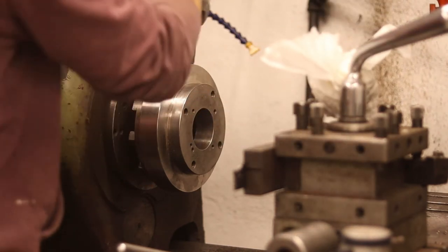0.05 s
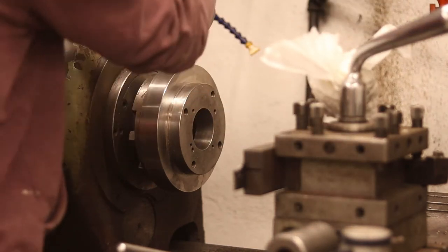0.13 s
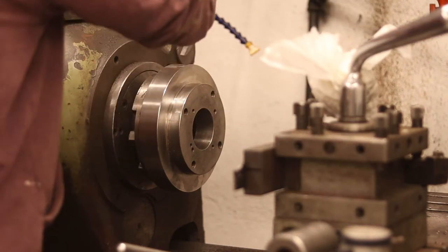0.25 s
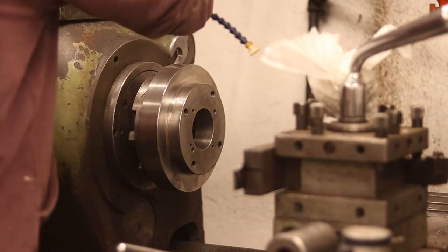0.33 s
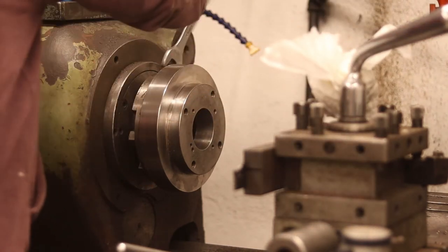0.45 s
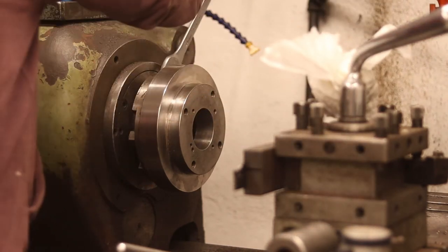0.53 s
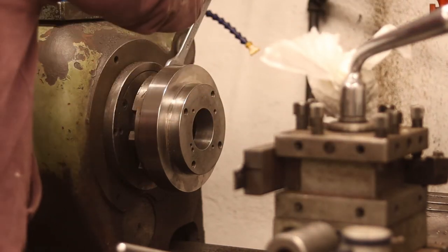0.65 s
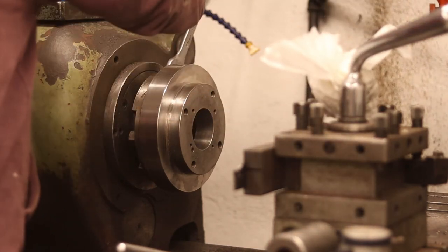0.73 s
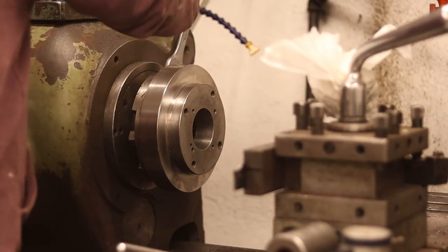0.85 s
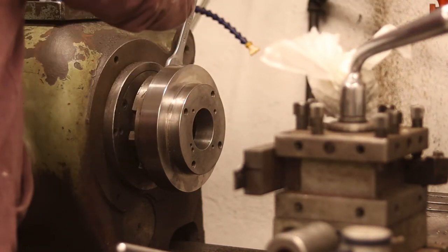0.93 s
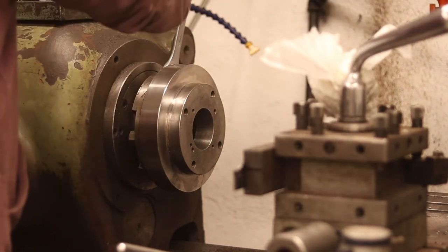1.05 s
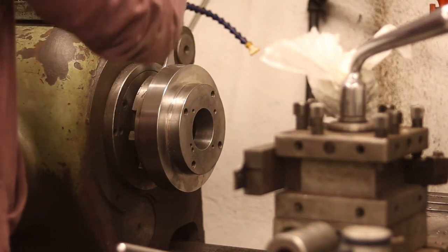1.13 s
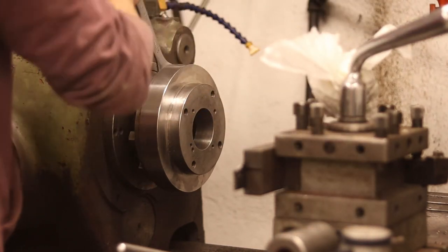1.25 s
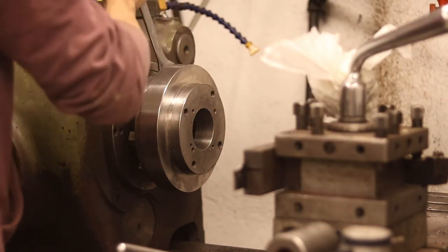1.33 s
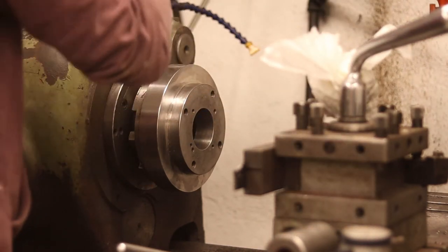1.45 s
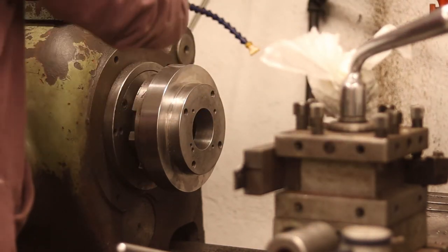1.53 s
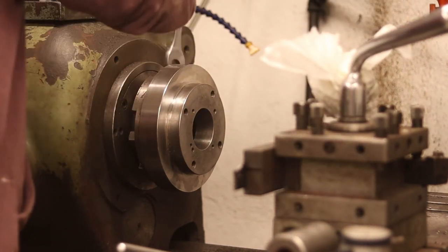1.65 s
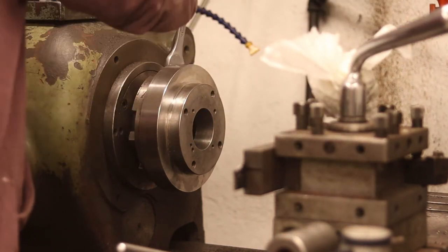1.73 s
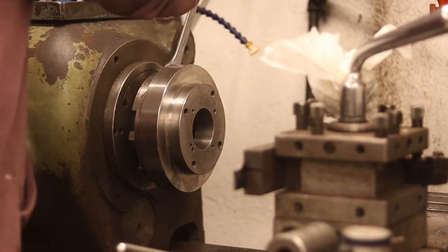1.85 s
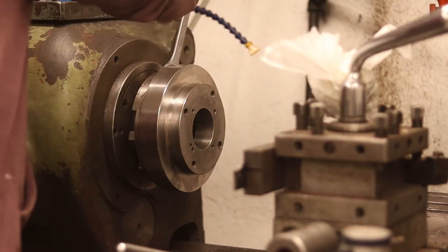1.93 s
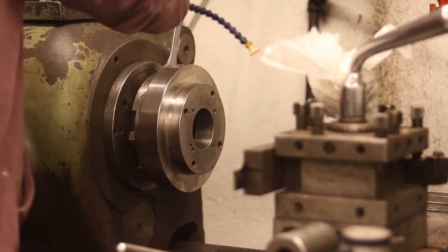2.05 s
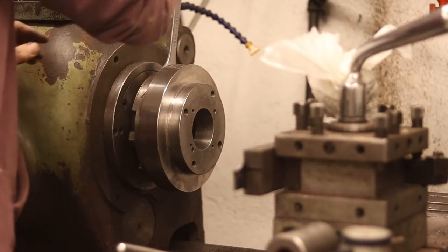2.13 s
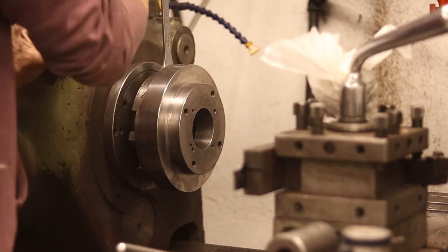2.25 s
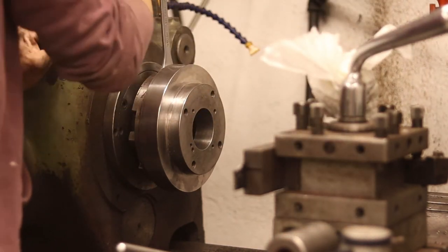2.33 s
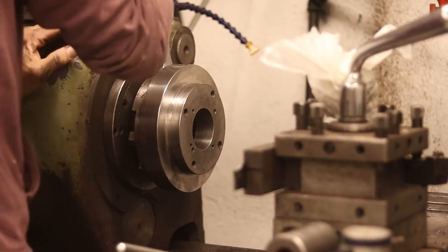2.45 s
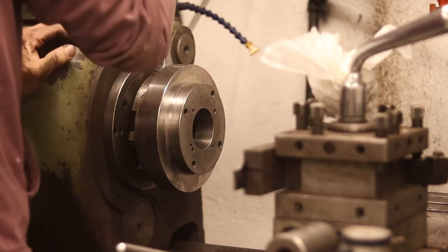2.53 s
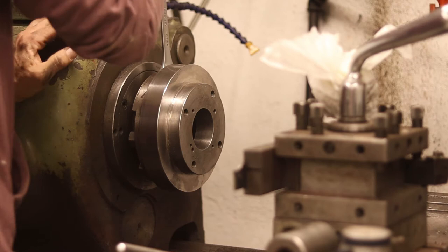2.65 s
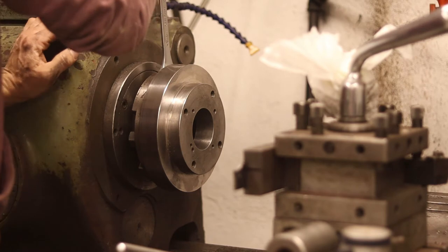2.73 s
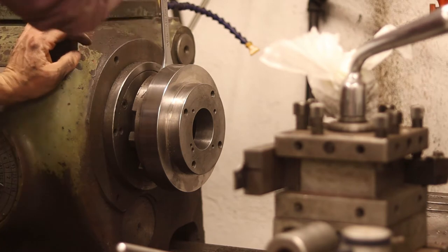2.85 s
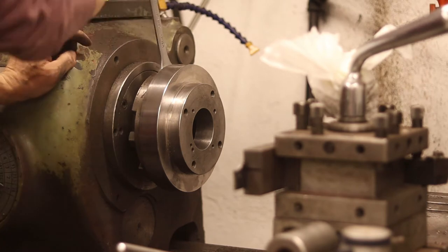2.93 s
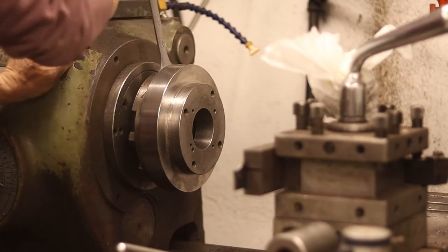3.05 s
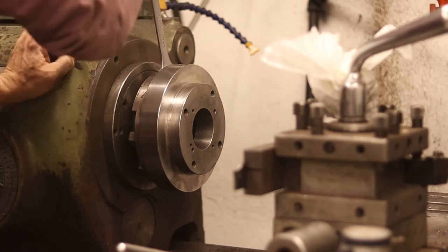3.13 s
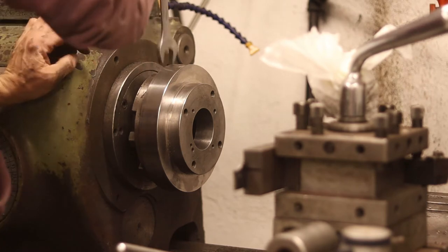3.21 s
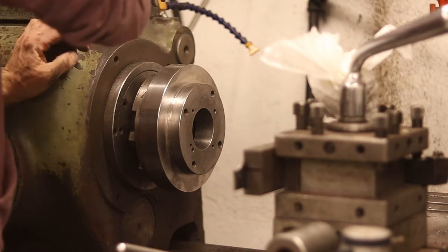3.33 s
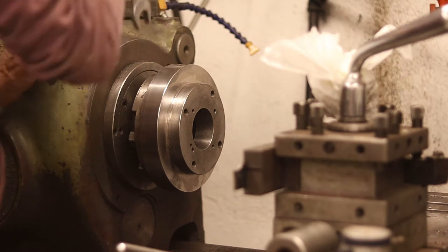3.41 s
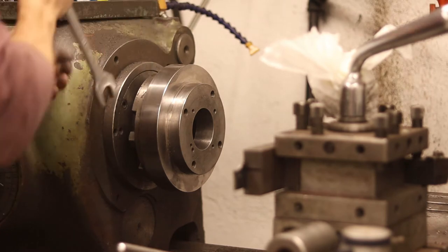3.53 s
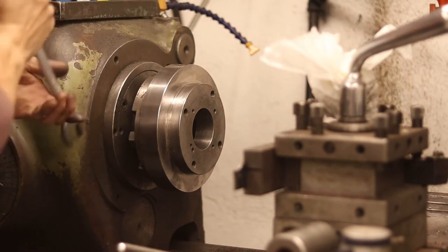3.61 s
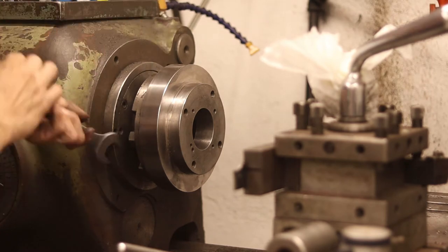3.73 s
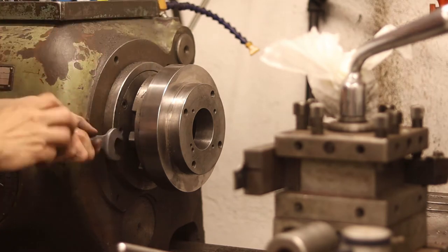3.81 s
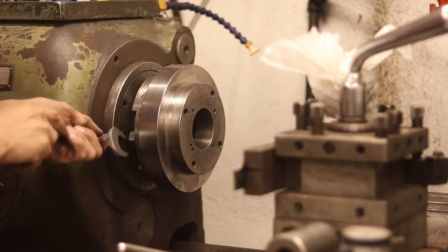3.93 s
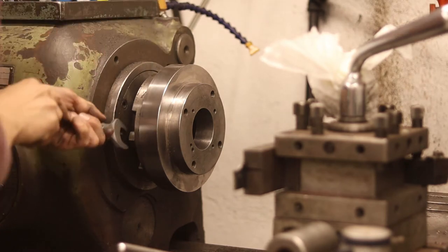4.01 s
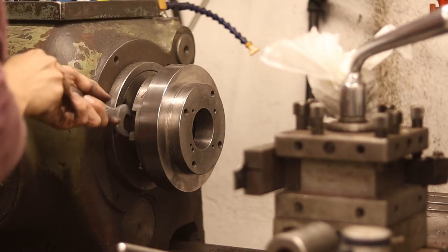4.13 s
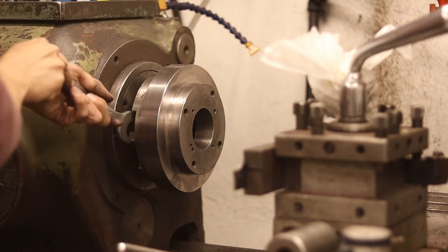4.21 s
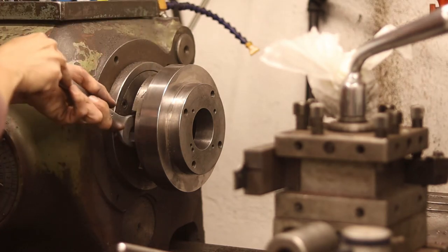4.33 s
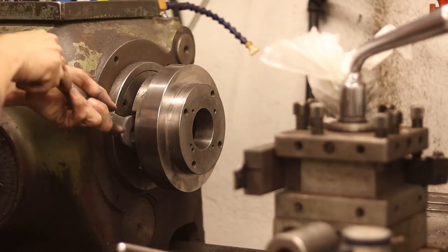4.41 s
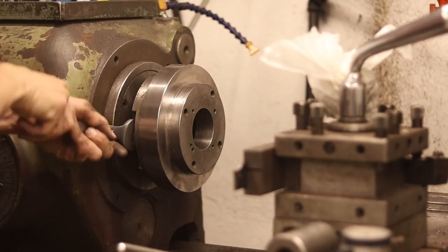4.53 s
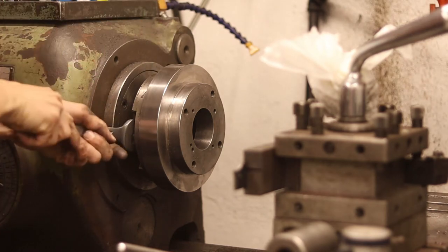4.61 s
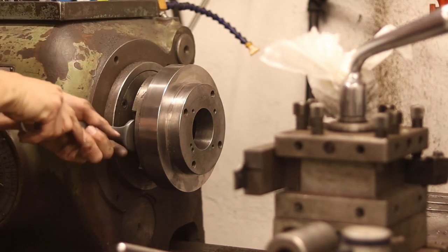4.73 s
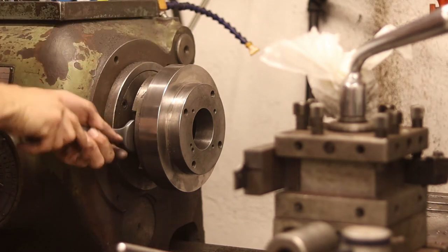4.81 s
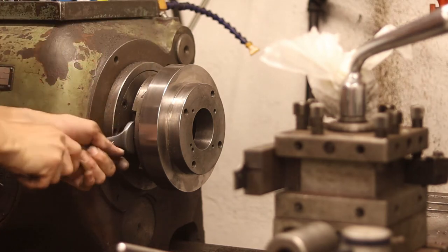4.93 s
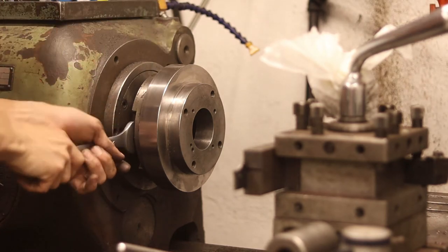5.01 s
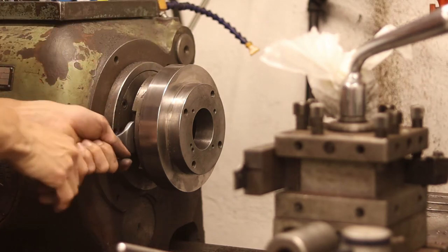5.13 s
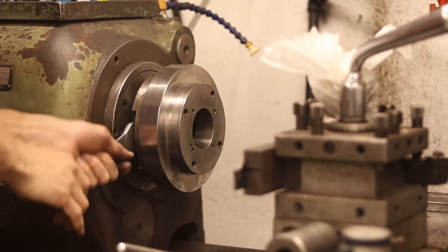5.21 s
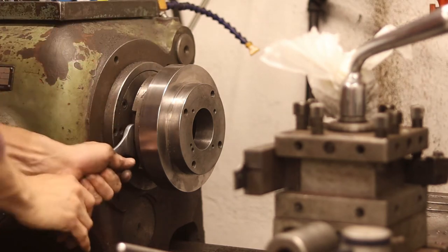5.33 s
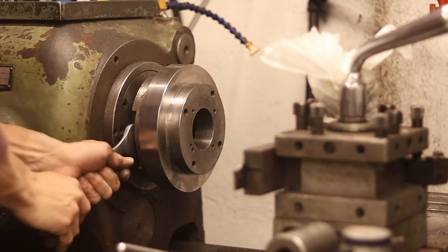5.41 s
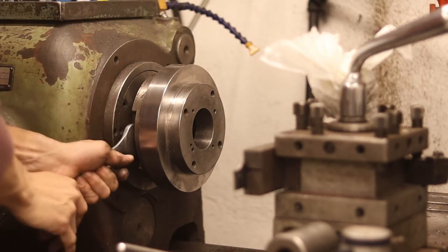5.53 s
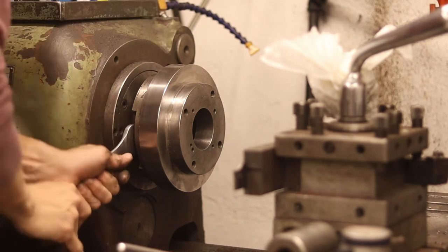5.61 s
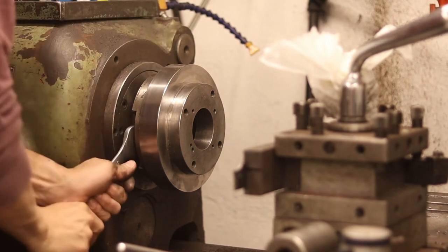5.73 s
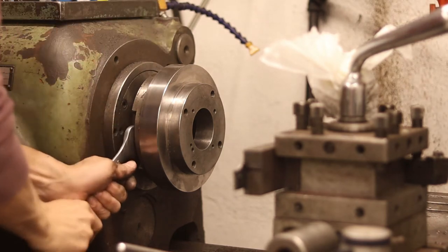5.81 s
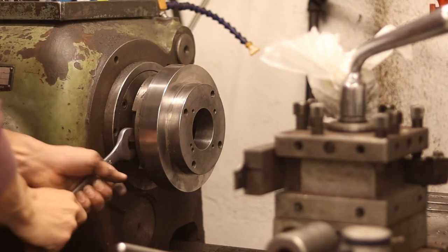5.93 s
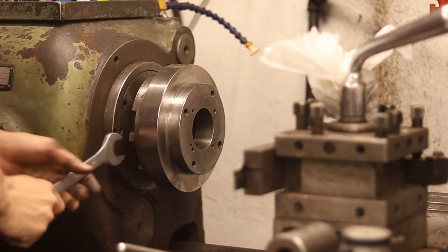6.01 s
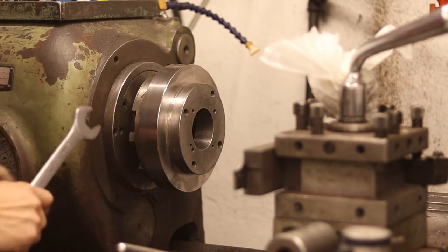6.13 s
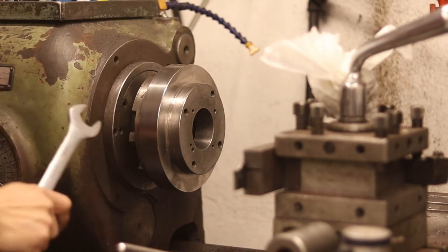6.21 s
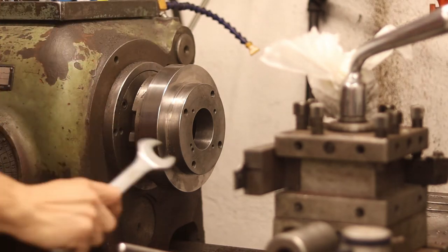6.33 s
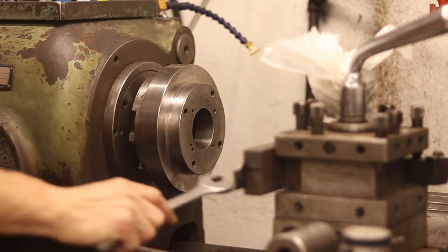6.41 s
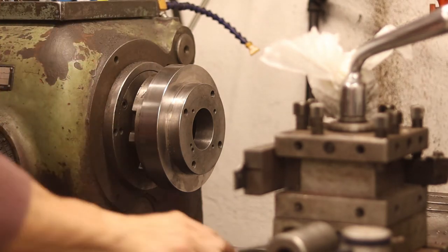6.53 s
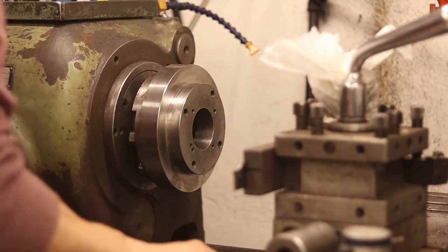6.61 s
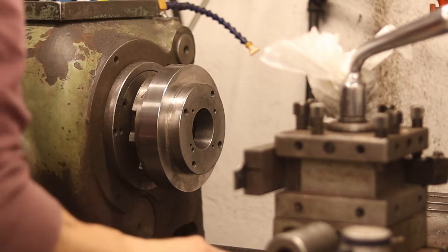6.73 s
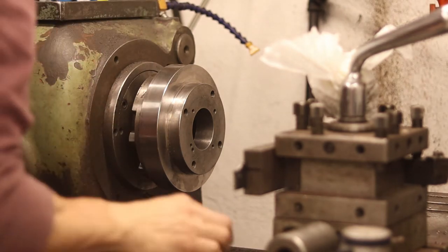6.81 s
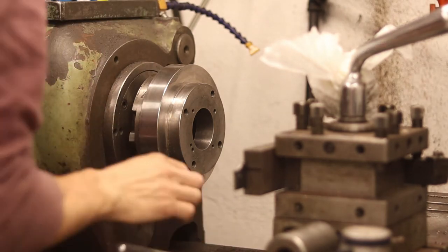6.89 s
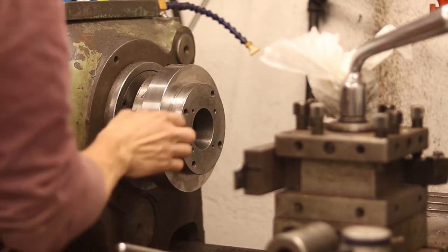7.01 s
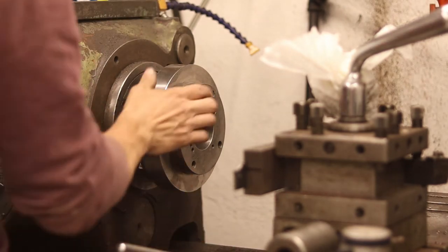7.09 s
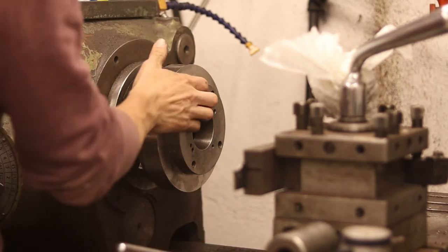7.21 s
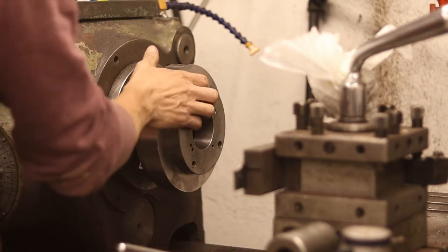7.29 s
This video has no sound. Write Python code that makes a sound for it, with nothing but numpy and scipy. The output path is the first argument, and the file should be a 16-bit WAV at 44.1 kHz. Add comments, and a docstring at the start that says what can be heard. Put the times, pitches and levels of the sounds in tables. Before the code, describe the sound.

In a small hard-walled workshop, metallic clinks and low gear clunks, brief scraping and sleeve rustle, then a dropped wrench bouncing and ringing out.

```python
"""Small hard-walled workshop, one microphone near a lathe: a steel spanner is set on the nuts of its spindle plate.
Held, it clinks as short damped modes plus a noise crack; each pull throws the spindle against its gears,
whose knocks and rebounds shake the modes of the cast headstock. Sleeve and steel rub in between as shaped noise.
At last the spanner drops on the lathe: each bounce feeds its freely ringing modes, with a noisy clatter.
Behind lie steady hiss, mains hum and faint far chirps."""
import sys
import numpy as np
from scipy import signal
from scipy.fft import rfft, irfft, next_fast_len
from scipy.io import wavfile
from scipy.ndimage import uniform_filter1d, minimum_filter1d, map_coordinates

SR = 44100
rng = np.random.default_rng(int(sys.argv[2]) if len(sys.argv) > 2 else 0)


def master(y):
    """Save y as 16-bit WAV."""
    cut = np.clip(np.atleast_2d(y).T, -1, 1)
    pcm = np.round(cut * 32767)  # scale
    wavfile.write(sys.argv[1], SR, pcm.astype(np.int16))


N = 324576  # samples


def amp(db):
    """Decibels to gain."""
    return 10 ** (np.asarray(db) / 20)


def unit(x):
    """x at rms 1."""
    return x / np.sqrt(np.mean(x ** 2) + 1e-20)


def normed(x):
    """x at energy 1."""
    return x / (np.linalg.norm(x) + 1e-20)


def along(points, hz):
    """(Hz, value) points read on a log frequency axis."""
    f, v = np.transpose(points)
    return np.interp(np.log(hz + 1), np.log(f + 1), v)


def fade(t, t60):
    """Exponential decay, 60 dB down after t60 seconds."""
    return np.exp(-np.log(1000) * t / max(t60, 1e-3))


def filtered(x, response):
    """x times a gain that depends on frequency."""
    m = next_fast_len(len(x) + 4096)
    spectrum = rfft(x, m) * response(np.fft.rfftfreq(m, 1 / SR))
    return irfft(spectrum, m)[:len(x)]


def noise(spectrum, size):
    """Noise of rms 1 with the given colour."""
    return unit(filtered(rng.standard_normal(size), lambda hz: amp(along(spectrum, hz))))


def wobble(rate, t):
    """A smooth random curve with rate knots a second."""
    return map_coordinates(rng.standard_normal(len(t) // 20), [t * rate])


def add(track, s, sound):
    """Mix a sound into the track at time s."""
    part = track[max(round(s * SR), 0):][:len(sound)]
    part += sound[:len(part)]


# how long the workshop's echo lasts: freq_hz, t60_s
ROOM_DECAY = [(80, 0.78), (400, 0.33), (1500, 0.36), (4500, 0.3), (8000, 0.29), (15000, 0.16)]


def in_room(x, wet_db, build_s=0.00067):
    """x with the workshop's echo: noise that builds within milliseconds and dies sooner in the treble."""
    hz, t, z = signal.stft(rng.standard_normal(SR * 2 // 3), SR, nperseg=256)
    decay = amp(-60 * t / along(ROOM_DECAY, hz)[:, None])
    tail = signal.istft(z * decay, SR, nperseg=256)[1]
    tail = normed(tail * (1 - np.exp(-np.arange(len(tail)) / SR / build_s)))
    return x + amp(wet_db) * signal.fftconvolve(x, tail)[:len(x)]


def peaked(edges, hz, below_db, above_db):
    """Band levels that fall away from hz, by so many dB per octave below and above it."""
    octaves = np.log2(np.sqrt(np.multiply(edges[:-1], edges[1:])) / hz)
    return np.where(octaves < 0, below_db, -above_db) * octaves


def voiced(x, edges, levels_db, window_s):
    """Colour a blow smoothly, steering the loudest moment of each band towards the given level."""
    gains = []
    for lo, hi, db in zip(edges, edges[1:], levels_db):
        bandpass = signal.butter(2, [lo, hi], "band", fs=SR, output="sos")
        band = signal.sosfilt(bandpass, x[:SR // 8])
        power = uniform_filter1d(band ** 2, max(int(window_s * SR), 2), mode="constant")
        gains.append((np.sqrt(lo * hi), db - 10 * np.log10(power.max())))
    size = 4096
    cepstrum = irfft(np.log(amp(along(gains, np.fft.rfftfreq(size, 1 / SR)))))
    cepstrum[1:size // 2] *= 2  # folded forward, so that nothing sounds before the contact
    cepstrum[size // 2 + 1:] = 0
    colour = irfft(np.exp(rfft(cepstrum)))
    return signal.fftconvolve(x, colour)[:len(x)]


# colour of the shop's hiss: freq_hz, level_db
AIR_COLOUR = [(12, -49), (20, -19), (32, -22), (53, -18), (74, -7.5), (107, -11), (126, -11.5), (203, -15),
              (497, -15.5), (657, -15.5), (1560, -20.5), (1750, -21), (3140, -25), (4910, -23.5),
              (15900, -33.5)]
# mains hum: pitch_hz, level_db (rms)
MAINS_HUM = [(50, -53), (100, -58.5), (200, -68)]


def background(air_db=-54):
    """Steady hiss of the shop, coloured noise, over mains hum, steady sines."""
    t = np.arange(N) / SR
    hum = np.zeros(N)
    for hz, db in MAINS_HUM:
        hum += amp(db) * np.sqrt(2) * np.sin(2 * np.pi * (hz * t + rng.random()))
    return hum + amp(air_db) * noise(AIR_COLOUR, N)


# faint far chirps: start_s, end_s, first_pitch_hz, last_pitch_hz, level_db (peak, before the echo)
FAR_CHIRPS = [(5.13, 5.22, 2195, 2090, -59.5), (5.299, 5.373, 2000, 1680, -55.5),
              (5.377, 5.56, 1720, 1850, -61), (5.61, 5.71, 2155, 2090, -57.5),
              (5.827, 5.905, 1747, 1760, -58), (6.088, 6.223, 2080, 1867, -56.5),
              (6.232, 6.265, 2912, 2805, -60)]


def chirps(wet_db=0):
    """Thin gliding tones from far off, each swelling and fading, with an echo as strong as the tone."""
    out = np.zeros(N)
    for start, end, first_hz, last_hz, db in FAR_CHIRPS:
        u = np.linspace(0, 1, max(int((end - start) * SR), 2))
        pitch_hz = first_hz + (last_hz - first_hz) * u
        tone = np.sin(2 * np.pi * np.cumsum(pitch_hz) / SR)
        add(out, start, amp(db) * np.sin(np.pi * u) * tone)
    return in_room(out, wet_db)


# strokes of sleeve and sliding steel: start_s, strongest_s, end_s, level_db, steel_share (0-1)
RUB_STROKES = [(2.232, 2.487, 2.6, -38, 0.18), (2.839, 3.075, 3.634, -42, 0.44),
               (3.545, 3.624, 3.71, -42, 0.7), (3.718, 3.722, 3.82, -44, 0.99),
               (3.719, 3.791, 4.05, -31, 0.95), (3.987, 4.039, 4.25, -33.5, 0.2),
               (4.173, 4.233, 4.41, -32.5, 0.5), (4.413, 4.58, 4.6, -53.5, 0.55),
               (5.697, 5.73, 6, -46.5, 0.27), (5.89, 5.912, 6.11, -44.5, 0.7),
               (7.107, 7.373, 7.44, -46.5, 0.38)]
# colour of the brushing sleeve: freq_hz, level_db
SLEEVE_COLOUR = [(88, -56.5), (150, -19), (240, -3.5), (523, 1.5), (648, 1.5), (1310, 0.5), (1410, -1),
                 (2800, -14), (5120, -9), (7560, -53), (8180, -27), (15900, -25)]
# colour of steel sliding on steel: freq_hz, level_db
SLIDE_COLOUR = [(120, -54), (200, -11), (509, -30), (669, -11), (1040, -4), (1140, -10), (1320, -3),
                (1470, -3), (1860, 3), (4020, -6), (5290, -2), (15900, -26.5)]


def rubbing(grain_db=1.0, grain_rate=140, wet_db=-5):
    """The sleeve brushes the machine and the jaw slides over steel: noise in grainy swells."""
    t = np.arange(N) / SR
    cloth, steel = np.zeros(N), np.zeros(N)
    for start, top, end, db, share in RUB_STROKES:
        rise = np.interp(t, [start, top], [0, 1])
        fall = np.interp(t, [top, end], [1, 0]) ** 2
        swell = amp(db) * rise * fall
        share = np.clip(share, 0, 1)
        cloth += np.sqrt(1 - share) * swell
        steel += np.sqrt(share) * swell
    grain = unit(amp(grain_db * wobble(grain_rate, t)))
    rub = cloth * noise(SLEEVE_COLOUR, N) + steel * noise(SLIDE_COLOUR, N)
    return in_room(grain * rub, wet_db)


# gears take up their play: start_s, level_db, fall below and fall above the casting's strongest band
# (dB per octave), first rebound against the first knock (dB)
GEAR_CLUNKS = [(.672, -22, 7, 8.5, -4), (1.147, -13.5, 7, 0.5, -5.5), (1.269, -23.5, 5.5, 13, 5),
               (1.753, -22, 5, -2, -8.5), (1.862, -24.5, 2.5, 14, -10), (1.926, -20.5, 3, 6, 2),
               (2.039, -24, 4, -1, -3), (2.114, -19, 5, 7.5, 4), (3.011, -16, 2, 13, -10),
               (3.024, -13.5, 3, 1, -4.5), (3.1, -23.5, 1, 1.5, -11), (3.856, -31, -1, -7.5, -6.5),
               (4.208, -45, -5.5, -3, -8), (4.309, -32, 3, 5, -11.5), (4.359, -31.5, 4, 18, -7),
               (4.539, -44, 1.5, 12, -5), (4.783, -18, 8, 16, -10), (7.342, -31.5, 4.5, 1, 2)]
# modes of headstock and spindle: pitch_hz, level_db, t60_s
CASTING_MODES = [(77.5, -11, 0.57), (125, -14, .15), (197, -9.5, 0.18), (271.4, -1.5, 0.097),
                 (303.5, -6.5, 0.039), (357.6, -2.5, 0.15), (393, -1, 0.17), (436, -16, 0.84),
                 (490, -3.5, 0.083), (539.4, 8, 0.042), (590.5, -2, 0.21), (654, 4.5, 0.046),
                 (746, -5, 0.084), (804, 3.5, 0.036), (946, -6, 0.16), (1190, -15, 0.067),
                 (1370, -36, 0.023), (1633, -7, 0.058), (1760, -49, 0.042)]
# colour of the dull thud in each knock: freq_hz, level_db
THUD_COLOUR = [(30, -39), (70, 7), (150, -11), (300, -3), (600, -1), (1000, -6), (2000, -15.5),
               (2600, -28.5), (6000, -34), (16000, -81)]
# colour shared by all clunks: level_db in 50-200, 200-370, 370-800, 800-2000 Hz
CLUNK_COLOUR_DB = [-4, -3, -2.5, -3.5]
CASTING_HZ, SWAY_HZ = 512, 46  # the casting answers most at the first and barely moves below the second
# the teeth knock again at this interval; each step in level falls this much more than the last
REBOUND_S, REBOUND_LOSS_DB = 0.025, 8
RATTLE_T60_S = 0.082  # chatter after each knock


def clunks(thud_db=1, thud_t60=0.036, teeth_per_s=260, rise_s=0.0019, wet_db=-1, knocks=3):
    """Gear teeth knock and rebound, each time in a quick dying rattle, and shake the heavy casting."""
    out, t = np.zeros(N), np.arange(SR * 2 // 3) / SR
    edges = [50, 200, 370, 800, 2000]  # Hz
    for s, db, below_db, above_db, rebound_db in GEAR_CLUNKS:
        bands_db = db + peaked(edges, CASTING_HZ, below_db, above_db) + CLUNK_COLOUR_DB
        ring = np.zeros(len(t))
        for hz, level, t60 in CASTING_MODES:
            ring += amp(level) * fade(t, t60) * np.sin(2 * np.pi * (hz * t + rng.random()))
        for k in range(knocks):
            hits = rng.random(len(t)) < teeth_per_s / SR
            teeth = hits * rng.standard_normal(len(t)) * fade(t, RATTLE_T60_S) / 2
            teeth[0] = 1  # the knock itself, before its rattle
            thud = normed(noise(THUD_COLOUR, len(t)) * fade(t, thud_t60))
            body = normed(ring) + amp(thud_db) * thud
            blow = signal.fftconvolve(teeth, body * (1 - np.exp(-t / rise_s)))[:len(t)]
            add(out, s + k * REBOUND_S, voiced(in_room(blow, wet_db), edges, bands_db, window_s=0.0094))
            bands_db = bands_db + rebound_db - k * REBOUND_LOSS_DB
    return signal.sosfilt(signal.butter(2, SWAY_HZ, "high", fs=SR, output="sos"), out)


# the spanner's modes, also played by the clinks and the drop below: pitch_hz: (level_db held on a nut,
# level_db dropped on its jaw, level_db dropped flat, free t60_s)
SPANNER_MODES = {955: (-22, -23, -36, .3), 1916: (-4, -5, -40, .17), 2350: (-13, -40, -40, .2),
                 2810: (-14, -36, -20, .6), 3284: (0, -5, -3, .33), 3540: (-8, -40, -40, .2),
                 4904: (-5, -12, -17, .55), 5066: (-3, -1, -5, .72), 5160: (-9, -12, -17, .4),
                 5238: (-4, -10, -19, .45), 7090: (0, -14, -3, .65), 7197: (-9, -18, -15, .35),
                 7972: (-5, -15, -2, .42), 8193: (-20, -26, -9, 1.1), 9464: (-6, -10, -13, .45),
                 9960: (-6, -9, -12, .5), 11035: (-14, -14, -20, .5), 11625: (-15, -22, -24, .55),
                 11850: (-13, -22, -18, .5), 12404: (-7, -5, -6, .52), 13675: (-9, -30, -8, .3),
                 14740: (-8, -19, -4, .28), 15360: (-14, -17, -11, .32)}
# colour of the crack of steel on steel, also in the clinks: freq_hz, level_db
CRACK_COLOUR = [(200, -13), (900, -2.5), (2200, -1), (5000, 6.5), (8000, -3), (11500, 0), (13000, 8),
                (16000, -16)]


def clatter(size, width_hz=170, valley_db=-15):
    """Noise of steel chattering on steel: contact smears each mode of the spanner into a broad hump."""
    def colour(hz):
        humps = 0
        for mode_hz, (_, _, flat_db, _) in SPANNER_MODES.items():
            humps = humps + amp(flat_db / 2) / np.hypot(1, (hz - mode_hz) / (width_hz / 2)) ** 2
        return amp(along(CRACK_COLOUR, hz)) * (amp(valley_db) + humps)
    return unit(filtered(rng.standard_normal(size), colour))


# the dropped spanner lands: start_s, level_db, flat_share (0 on its jaw - 1 flat), clatter level_db
DROP_BOUNCES = [(6.715, -13.5, 0, -6.5), (6.7897, -12, 1, -14), (6.825, -21.5, 0.82, -34),
                (6.879, -21, 1, -25), (6.938, -25, 0.72, -26)]
SETTLE_S = 7.036  # from here the spanner lies still and its support damps it


def dropped_spanner(clatter_t60=0.075, rest_t60=0.71, flutter_db=4.0, flutter_rate=40, chatter_db=-18,
                    wet_db=-8, clatter_wet_db=-3):
    """Out of the hand it rings long; each bounce feeds its modes anew, and they flutter as it rocks to rest."""
    start = DROP_BOUNCES[0][0]
    t = np.arange(SR) / SR
    ring, contacts = np.zeros(SR), np.zeros(SR)
    for hz, (_, jaw_db, flat_db, t60) in SPANNER_MODES.items():
        energy = np.zeros(SR)
        for s, db, flat, _ in DROP_BOUNCES:
            gain = amp(db) * np.interp(flat, [0, 1], amp([jaw_db, flat_db]))
            add(energy, s - start, (gain * fade(t, t60)) ** 2)
        phase = 2 * np.pi * (hz * t + rng.random()) + wobble(flutter_rate, t) / 2
        flutter = amp(flutter_db * wobble(flutter_rate, t))
        ring += np.sqrt(energy) * flutter * np.sin(phase)
    ring *= fade(np.maximum(t + start - SETTLE_S, 0), rest_t60)
    for s, _, _, clatter_db in DROP_BOUNCES:
        add(contacts, s - start, amp(clatter_db) * clatter(SR) * fade(t, clatter_t60))
    swing = np.sqrt(np.abs(uniform_filter1d(ring ** 2, size=128)))
    contacts += amp(chatter_db) * swing * clatter(SR)  # the ringing steel buzzes on its support
    out = np.zeros(N)
    add(out, start, in_room(ring, wet_db) + in_room(contacts, clatter_wet_db))
    return out


# spanner meets nut: start_s, level_db, strongest_hz that the contact excites, fall to either side
# (dB per octave), grip (0 loose - 1 wedged), crack against ring (dB)
NUT_CLINKS = [(0.655, -37.5, 1800, 16, 0, 10), (0.671, -28.5, 3640, 2, 0.66, 2.5),
              (.771, -16.5, 3330, 6, 0.45, -10), (1.1417, -16, 6000, 8.5, 0.23, 5.5),
              (1.4132, -29, 1960, 9, 0, -10.5), (1.4512, -21.5, 4170, 19, 0.33, -41),
              (1.7538, -18.5, 2250, 7, 0.34, -6), (1.8398, -13.5, 5900, 18.5, 0.13, -9),
              (1.843, -21, 1800, 7, 0, -2), (1.874, -22.5, 1890, 5.5, 0, 7),
              (2.036, -20, 2960, 8.5, 0.18, -4.5), (3.4449, -28, 4470, 24.5, 0.71, 16),
              (3.8541, -12.5, 5050, 6.5, 0.59, -11), (3.863, -12.5, 3370, 26, 0.026, -6),
              (3.876, -10, 8600, 14, 0.14, -13), (4.254, -23.5, 5240, 9, 0.75, -9),
              (4.296, -18, 6470, 11, 0.78, 3), (4.3048, -24.5, 4630, 3, 0.95, 9),
              (4.347, -24, 3560, 10, 0.78, -2.5), (4.773, -24.5, 2970, 4.5, 0.37, 11),
              (4.779, -9.5, 4700, 17.5, 1, -7), (5.999, -41, 4400, 7.5, 0, -4)]
# colour shared by all clinks: level_db in 1.5-2.6, 2.6-4, 4-6.2, 6.2-10.5, 10.5-16 kHz, rounded
CLINK_COLOUR_DB = [-0.5, -1.5, 0.5, -2, -3]
LOOSE_T60_S, WEDGED_T60_S = 0.05, 0.016  # ring of the spanner at either end of the grip
LOOSE_ECHO_DB, WEDGED_ECHO_DB = 5, -6  # a short wedged snap stands out of the room more
WEDGED_SHARP = 0.0093  # a firmly wedged jaw stiffens the spanner and raises its modes, by at most this share


def clinks(crack_t60=0.03, scatter_db=2, detune=0.0043):
    """Hand and nut damp the spanner, the more the firmer the grip, and shift its modes a little each time."""
    out, t = np.zeros(N), np.arange(SR * 2 // 3) / SR
    edges = [1500, 2600, 4000, 6200, 10500, 16000]  # Hz
    for s, db, strongest_hz, fall_db, grip, crack_db in NUT_CLINKS:
        t60 = np.interp(grip, [0, 1], [LOOSE_T60_S, WEDGED_T60_S])
        echo_db = np.interp(grip, [0, 1], [LOOSE_ECHO_DB, WEDGED_ECHO_DB])
        sharp = WEDGED_SHARP * np.clip(grip, 0, 1) ** 10  # only near the wedged end
        ring = np.zeros(len(t))
        for hz, (held_db, *_) in SPANNER_MODES.items():
            level, shift, phase = rng.standard_normal(3)
            mode_hz = hz * (1 + sharp + detune * shift)
            ring += amp(held_db + scatter_db * level) * np.sin(2 * np.pi * (mode_hz * t + phase))
        crack = noise(CRACK_COLOUR, len(t)) * fade(t, crack_t60)
        contact = normed(ring * fade(t, t60)) + amp(crack_db) * normed(crack)
        blow = in_room(contact, echo_db)
        bands_db = db + peaked(edges, strongest_hz, fall_db, fall_db) + CLINK_COLOUR_DB
        add(out, s, voiced(blow, edges, bands_db, window_s=0.0056))
    return out


def scene():
    """Everything at one microphone near the lathe."""
    behind = background() + chirps()
    lathe = rubbing() + clunks()
    spanner = dropped_spanner() + clinks()
    return (behind + lathe + spanner)[None]


EDGE_HZ, TOP_HZ = 15700, 15950  # the treble falls steeply around the first; nothing passes from the second up


def record(dry, ceiling=1.0, hold_s=0.00066):
    """A fast limiter holds the hardest blows under full scale; the treble rolls off into the band limit."""
    span = max(int(hold_s * SR), 2)
    needed = np.minimum(1, ceiling / (np.abs(dry) + 1e-9))
    limited = dry * uniform_filter1d(minimum_filter1d(needed, span), span)

    def band_limit(hz):
        return (hz < TOP_HZ) / np.sqrt(1 + (hz / EDGE_HZ) ** 120)

    return np.array([filtered(channel, band_limit) for channel in limited])


dry = scene()
out = record(dry)
master(out)
```